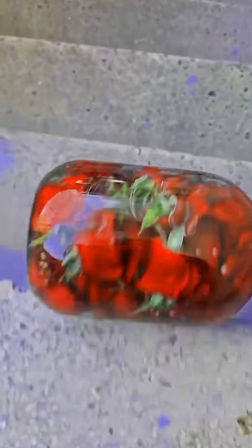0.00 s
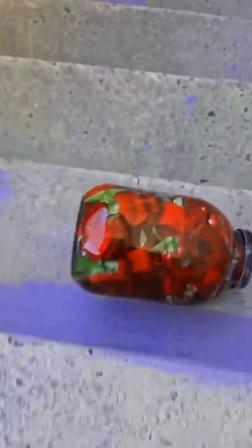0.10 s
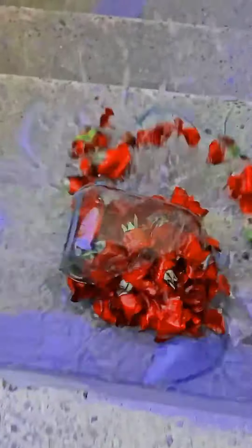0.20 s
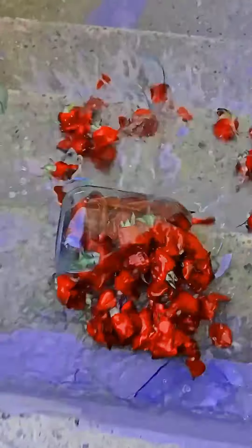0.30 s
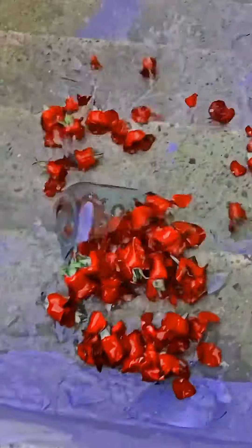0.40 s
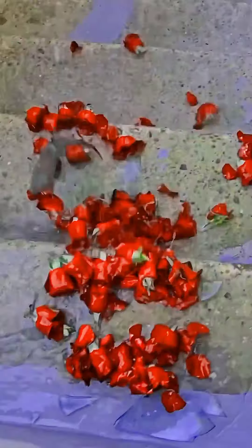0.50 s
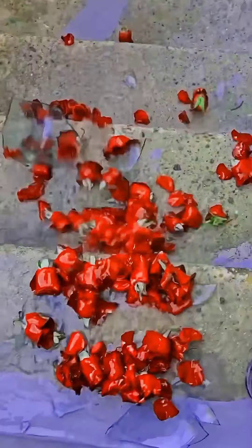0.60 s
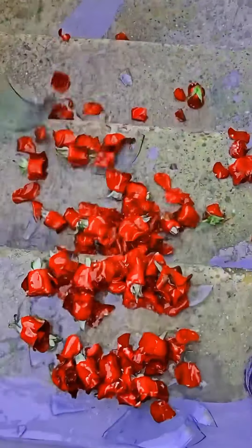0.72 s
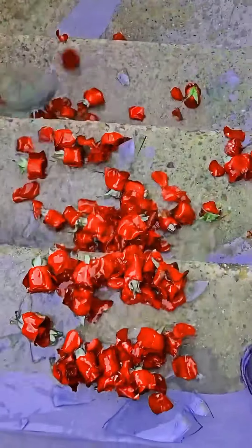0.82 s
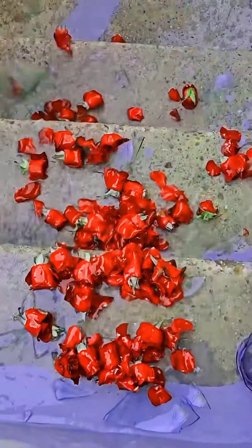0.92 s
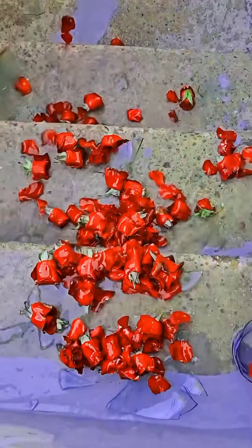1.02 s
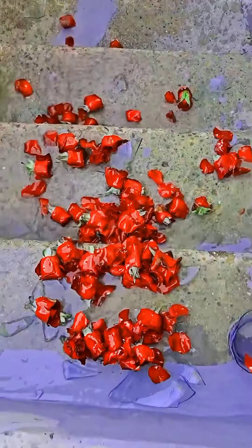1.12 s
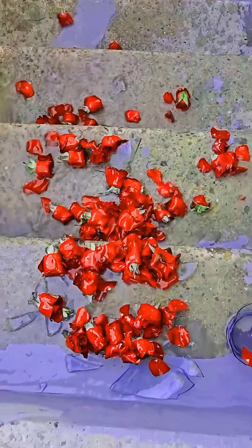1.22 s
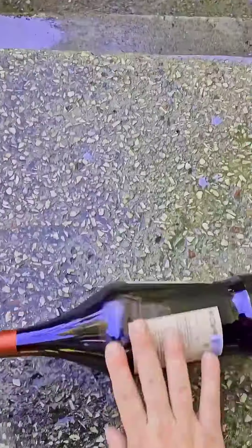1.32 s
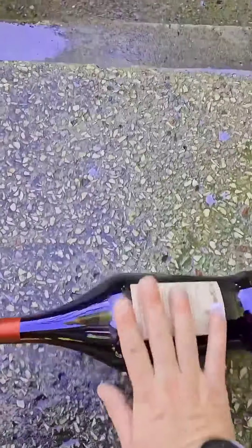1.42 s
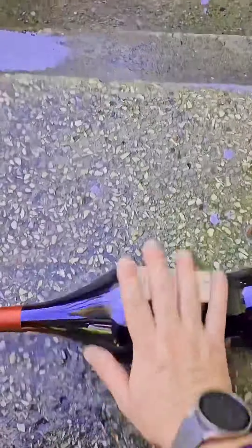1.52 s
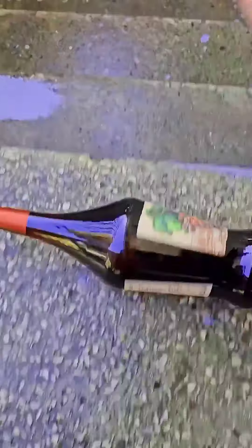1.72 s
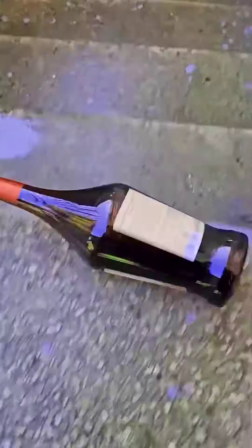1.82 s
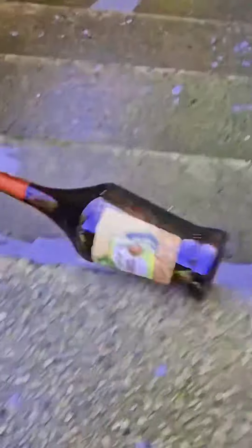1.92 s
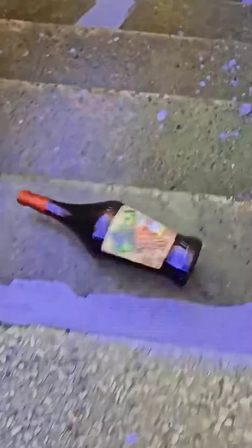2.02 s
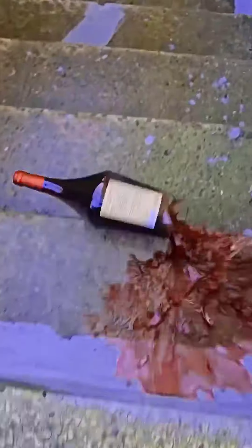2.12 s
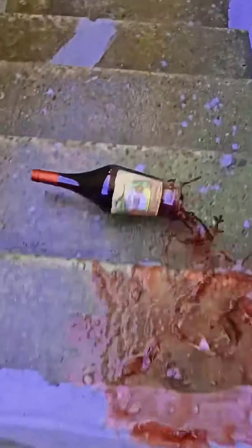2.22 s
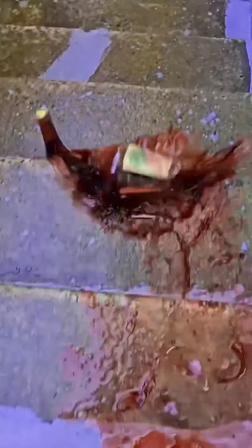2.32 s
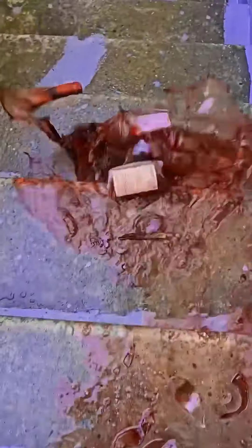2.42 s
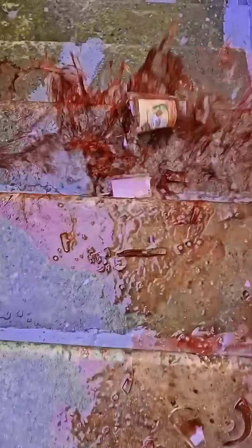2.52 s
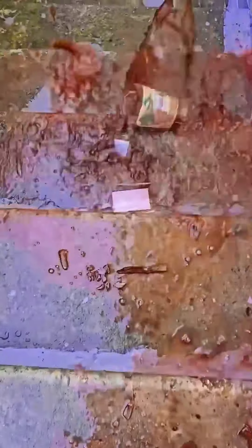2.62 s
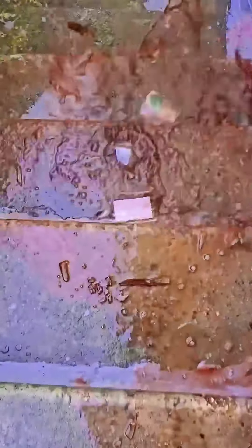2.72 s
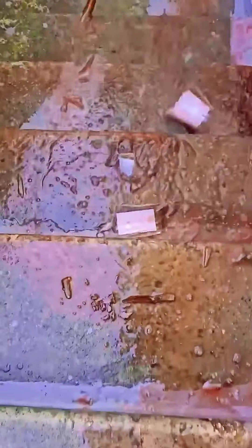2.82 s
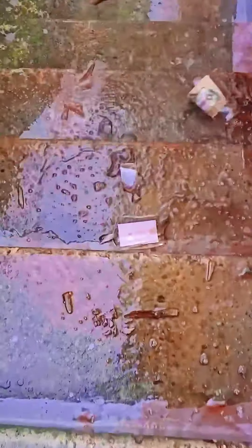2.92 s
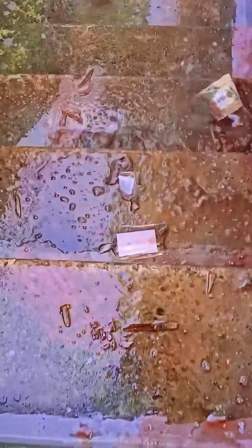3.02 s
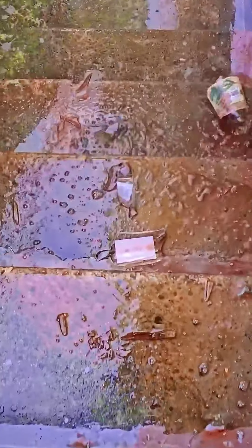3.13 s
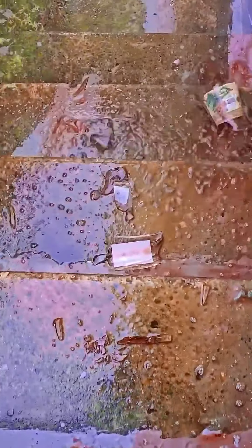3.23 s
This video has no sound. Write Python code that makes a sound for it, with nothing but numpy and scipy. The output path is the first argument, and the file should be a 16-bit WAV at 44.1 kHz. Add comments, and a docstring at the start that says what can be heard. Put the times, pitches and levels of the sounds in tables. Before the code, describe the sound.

Glass breaks on outdoor stone steps, shards clinking; abrupt cut, bottle rolls, smashes and spills.

```python
"""Glass breaking on stone, in two scenes

A full glass jar bursts on stone steps and its shards clink and skitter down them. After an abrupt cut a
full bottle rolls over pebbled concrete, knocks on a step edge, breaks, spills and scatters its pieces.
Shards and vessels ring as decaying modes; crunch, scrape and spill are shaped noise. All is heard
outdoors and close, with short reflections from the steps, over a low rumble.
"""
import sys
import numpy as np
from scipy import signal
from scipy.fft import rfft, irfft, next_fast_len
from scipy.io import wavfile

SR = 44100
rng = np.random.default_rng(int(sys.argv[2]) if len(sys.argv) > 2 else 0)


def waveform_to_disk(signal):
    """Save audio, clipped to [-1, 1], as 16-bit WAV at the path in sys.argv[1]."""
    frames = np.transpose(np.atleast_2d(signal))
    scaled = np.clip(frames, -1, 1) * 32767
    samples = np.round(scaled).astype(np.int16)
    wavfile.write(sys.argv[1], SR, samples)


N = 143325
T = np.arange(N) / SR
AGE = T[:SR * 2 // 5]  # time since an onset [s]
CUT_S = 1.369  # the jar's sound stops here
GLASS_PAN_DB = 3.5  # the pieces scatter to the left


def undb(db):
    """Logarithmic level: decibels to amplitude gain."""
    return 10 ** (np.asarray(db) / 20)


def curve(rows):
    """Envelope: gain over time, linear in decibels between (time [s], level [dB]) points."""
    times, levels = np.array(rows).T
    return undb(np.interp(T, times, levels))


def unit(x):
    """Normalisation to an rms of 1."""
    return x / np.sqrt(np.mean(x ** 2))


def pan(db):
    """Level difference between the ears: left and right gains, positive to the left."""
    return unit(undb(np.array([[db], [-db]]) / 2))


def add(out, s, x):
    """Superposition: mix a sound in at its time; what began before the cut ends there."""
    start = max(int(s * SR), 0)
    end = int(CUT_S * SR) if s < CUT_S else N
    length = max(min(x.shape[-1], end - start, out.shape[-1] - start), 0)
    out[..., start:start + length] += x[..., :length]


def grit(size, spread_db, likeness):
    """Partly correlated noise: two ears share a fraction of its power; its strength varies unevenly."""
    left_right, shared = rng.standard_normal((2, size)), rng.standard_normal(size)
    strength_db = spread_db * rng.standard_normal(size // 32 + 1)
    strength = np.repeat(undb(strength_db), 32)[:size]  # a new strength every 32 samples
    return (np.sqrt(likeness) * shared + np.sqrt(1 - likeness) * left_right) * strength


def colour(x, points):
    """Spectral shaping by (frequency [Hz], level [dB]) points on a logarithmic axis, to rms 1."""
    hz, db = np.array(points).T
    size = next_fast_len(N)
    f = np.arange(size // 2 + 1) * SR / size + 1  # 1 Hz offset avoids log(0)
    gain = undb(np.interp(np.log(f), np.log(hz), db))
    return unit(irfft(rfft(x, size) * gain, size)[:, :N])


def ring(hz, t60, phase=0):
    """Damped oscillation: one mode that falls by 60 dB in t60 seconds."""
    t = T[:int(t60 * SR) + 2]
    return np.sin(2 * np.pi * min(hz, SR / 2) * t + phase) * undb(-60 * t / t60)


CONTACT_S = 0.0018  # the ring builds up over the contact
PAIR_HZ = 46.6  # spacing of the paired modes at half a turn


def shard(hz, t60, turn):
    """Beating of a close pair of modes that reaches the ears out of step by a fraction of a turn."""
    ears = []
    for phase in (np.pi * turn, -np.pi * turn):
        main = ring(hz, t60, phase)
        partner = .5 * ring(hz + 2 * PAIR_HZ * turn, t60, 2 * phase + np.pi / 2)
        ears.append(main + partner)
    pair = np.array(ears)
    return pair * np.minimum(T[:pair.shape[1]] / CONTACT_S, 1)


SHARD_SPACING_HZ, SHARD_RIPPLE_DB = 120.1, 5.5  # the broad resonances of a handful of pieces


def pieces(x):
    """Random resonance: colour a crunch with the pieces involved, differently at each ear."""
    f = np.arange(x.shape[1] // 2 + 1) * SR / x.shape[1]
    depth_db = SHARD_RIPPLE_DB * np.minimum(f / 2500, 1)  # full depth above 2500 Hz
    ripples = [np.interp(f / SHARD_SPACING_HZ, np.arange(256), z) for z in rng.standard_normal((2, 256))]
    gain = undb(depth_db * np.array(ripples))
    return irfft(rfft(x) * unit(gain), x.shape[1])


# glass crunching on stone; levels are relative and shifted by CRUNCH_DB or SPLINTER_DB:
# (time [s], rise [s], t60 [s], thud [dB], middle [dB], treble [dB], top [dB])
CRUNCHES = [ (.042, 0.012, 0.12, -25, -30, -31.5, -43.5), (0.193, 0.034, 0.18, -22, -12.5, -11.5, -18.5),
            (0.304, 0.0087, 0.022, -35, -30, -15.5, -47), (0.341, 0.013, 0.094, -25.5, -22.5, -23, -17.5),
            (0.37, 0.0042, 0.21, -39, -27, -24.5, -37), (0.475, 0.0041, 0.085, -51, -26, -9.5, -22.5),
            (.529, 0.0049, 0.16, -25.5, -20.5, -16, -21), (0.585, 0.012, 0.16, -33, -25.5, -20, -16),
            (0.741, 0.0081, 0.11, -40, -33.5, -21.5, -17), (0.838, 0.0033, 0.49, -35.5, -35, -26.5, -23.5),
            (0.953, 0.017, 0.2, -20.5, -18.5, -19, -26.5), (1.126, 0.0039, 0.16, -43, -27.5, -23.5, -40),
            (1.162, 0.024, 0.2, -30, -25, -26, -30), (1.36, 0.006, 0.076, -57, -63, -25, -22.5),
            (1.748, 0.0041, 0.052, -28, -42, -20.5, -23.5),
            (2.02, 0.0011, 0.16, -26.5, -17.5, -21.5, -29.5), (2.0636, 0.0016, 0.019, -38, -10, -7, -14.5),
            (2.068, 0.0054, 0.42, -26.5, -33, -27.5, -30.5), (2.133, 0.00094, 0.03, -35, -13, -19.5, -27),
            (2.272, 0.002, 0.048, -14.5, -12, -13, -21.5), (2.279, 0.018, 0.15, -22, -24, -27.5, -39),
            (2.465, 0.0082, 0.2, -26, -15.5, -16.5, -24), (2.569, 0.0021, 0.057, -35, -16.5, -21, -29),
            (2.571, 0.031, 0.12, -43, -22.5, -18, -21.5), (2.773, 0.012, 0.27, -40, -22.5, -22, -27.5),
            (2.824, 0.008, 0.3, -65, -42.5, -32.5, -32.5), (2.975, 0.015, 0.12, -41.5, -32.5, -24.5, -35),
            (3.117, 0.0023, 0.18, -41.5, -28, -34, -31.5)]
# the thud, middle, treble and top bands: (lower edge [Hz], upper edge [Hz])
CRUNCH_BANDS = [(75, 350), (420, 2090), (2400, 7850), (7000, 15200)]
# power shared by the two ears in each band: (likeness [0-1])
EAR_LIKENESS = [0.97, 0.47, 0.076, 0.049]
GRIT_DB, CRUNCH_DB, SPLINTER_DB = 3.5, -2, -13.5
SPLINTER_T60_S = 0.079  # at most, before a random factor of 0.5 to 1.5


def crashes(count=26):
    """Fracture noise: each crash is a swell of tiny fractures that throws off ringing splinters."""
    out = np.zeros((2, N))
    bands = []
    for edges, likeness in zip(CRUNCH_BANDS, EAR_LIKENESS):
        band_pass = signal.butter(3, edges, "band", fs=SR, output="sos")
        bands.append(unit(signal.sosfilt(band_pass, grit(N, GRIT_DB, likeness))))
    for s, rise, t60, thud_db, mid_db, treble_db, top_db in CRUNCHES:
        swell = np.minimum(AGE / rise, 1) ** 2
        env = swell * undb(-60 * np.maximum(AGE - rise, 0) / t60)
        i = int(s * SR)
        crunch = 0
        for k, (db, band) in enumerate(zip((thud_db, mid_db, treble_db, top_db), bands)):
            side = pan(GLASS_PAN_DB * k / 2)  # higher bands lie further left
            crunch = crunch + undb(db + CRUNCH_DB) * band[:, i:i + len(AGE)] * side
        add(out, s, pieces(crunch) * env[:crunch.shape[1]])
        for k, (place, when, length, turn, side) in enumerate(rng.random((count, 5))):
            hz = 3000 + 13000 * (k + place) / count
            db = np.interp(hz, [5000, 9000], [treble_db, top_db]) + SPLINTER_DB
            life = min(SPLINTER_T60_S, t60) * (.5 + length)
            splinter = undb(db) * shard(hz, life, turn - .5)
            add(out, s + rise * (.5 + when), splinter * pan(GLASS_PAN_DB + 10 * (side - .5)))
    return out


# single shards that ring; levels are relative: (time [s], level [dB], pitch [Hz], t60 [s])
SHARD_LANDINGS = [ (.321, -19, 7440, 0.042), (0.369, -13.5, 3266, 0.097), (.373, -14.5, 5010, 0.045),
                  (.481, -13.5, 4478, .083), (.479, -30, 4700, 0.074), (0.556, -18, 7040, 0.13),
                  (.591, -13, 3200, 0.028), (.593, -12.5, 9259, .072), (0.593, -17.5, 4203, .14),
                  (.646, -15.5, 4220, .09), (0.693, -11, 8200, 0.083), (.695, -22, 5020, 0.12),
                  (.812, -19.5, 4304, .18), (.836, -8.5, 11440, 0.05), (.842, -19, 6110, 0.21),
                  (.905, -17, 7708, 0.12), (1.212, -25.5, 11940, .08), (1.25, -20, 8970, 0.1),
                  (1.283, -21, 4430, 0.081), (1.36, -13, 9431, 0.04), (2.224, -11.5, 7670, .021),
                  (2.516, -19, 5760, 0.078), (2.607, -17.5, 7110, .11), (2.784, -18.5, 3919, 0.062),
                  (2.899, -25.5, 4498, 0.17), (2.975, -21, 5790, .1), (2.974, -15, 3697, 0.037),
                  (2.981, -16, 3893, 0.13), (3.121, -34, 3890, 0.21)]
OVERTONE_DB = -15  # within the octave above a shard's pitch
CHATTER_S, CHATTER_DB = .014, -7.5  # a shard touches down again within this time


def clinks(count=3):
    """Impact excitation: a shard lands, rings with uneven overtones and chatters on the stone."""
    out = np.zeros((2, N))
    for s, db, hz, t60 in SHARD_LANDINGS:
        main_turn = rng.random() - .5
        tone = shard(hz, t60, 0.6 * main_turn)
        for above, turn in rng.random((count, 2)):
            add(tone, 0, undb(OVERTONE_DB) * shard(hz * (1 + above), t60, turn - .5))
        landing = tone.copy()
        for when in rng.random(count):
            add(landing, CHATTER_S * when, tone * undb(CHATTER_DB) / np.sqrt(count))
        same_power = unit(landing) * np.std(tone)  # chatter leaves the overall level alone
        add(out, s, same_power * undb(db) * pan(GLASS_PAN_DB))
    return out


# the jar's larger pieces: (pitch [Hz])
JAR_PIECES = [2680, 3330, 3740, 4215, 4540, 4690, 4940, 5700, 6216, 6680, 7090, 7660, 7725, 8270, 9360,
              9720, 11600]
# effort of the moving pieces, also followed by skitter(); relative: (time [s], level [dB])
FRAGMENT_EFFORT = [(.18, -55), (.23, -26.5), (.6, -25), (1.08, -30), (1.22, -27.5), (1.36, -31),
                   (1.37, -42.5), (2.01, -37.5), (2.07, -33), (2.44, -34), (2.62, -34), (2.88, -27.5),
                   (2.97, -48)]
JAR_SHARD_T60_S = .18


def tinkle(count=28):
    """Repeated impact: the jar's larger pieces tumble down, each ringing near its own pitch."""
    out, effort = np.zeros((2, N)), curve(FRAGMENT_EFFORT)
    for hz in JAR_PIECES:
        for k, (when, size, turn, side, bend) in enumerate(rng.random((count, 5))):
            s = CUT_S * (k + when) / count
            gain = effort[int(s * SR)] * undb(-20 * size)
            bent_hz = hz * (1 + (bend - .5) / 20)
            tone = gain * shard(bent_hz, JAR_SHARD_T60_S, turn - .5)
            add(out, s, tone * pan(GLASS_PAN_DB + 10 * (side - .5)))
    return out


SKITTER_T60_S = 0.1  # before a random factor of 0.06 to 1.06
TINKLE_DB, SCRAPE_DB = -10.5, -12.5  # relative to the effort curve


def skitter(count=1300):
    """Impacts and friction: small fragments tinkle and scrape as they slide down the steps."""
    tinkles = np.zeros((2, N))
    for when, pitch, length, size, turn, side in rng.random((count, 6)):
        hz = 2500 + 13500 * pitch ** 1.4
        tone = shard(hz, SKITTER_T60_S * (0.06 + length), turn - .5)
        add(tinkles, when * N / SR, tone * undb(-16 * size) * pan(14 * (side - .5)))
    scrape = colour(grit(N, spread_db=4.5, likeness=0.26),
                    [(500, 10.5), (2000, 8), (4500, 14), (9000, 8), (16000, -27.0)])
    return (undb(TINKLE_DB) * unit(tinkles) + undb(SCRAPE_DB) * scrape) * curve(FRAGMENT_EFFORT) * pan(3.7)


# heavy knocks of the full vessel on stone: (time [s], peak level [dB], pitch [Hz], t60 [s])
VESSEL_KNOCKS = [ (0.249, -15, 260, 0.027), (.536, -7, 587, 0.025), (1.6118, -9, 1500, 0.0047),
                 (1.6374, -4.5, 1530, 0.003), (1.702, -7, 950, 0.0039), (1.727, -5, 950, 0.0045),
                 (1.7333, -17, 960, .005), (1.758, -35, 1000, 0.0042), (1.7765, -4.5, 1000, 0.0018),
                 (1.802, -14, 1200, 0.0032), (1.821, -8, 1190, 0.0017), (1.825, -2.5, 1020, 0.0024),
                 (1.8518, -16, 1090, 0.0024), (1.862, 0, 1500, 0.0015), (1.873, -19, 930, 0.0035),
                 (1.904, -20.5, 190, .057), (1.933, -15, 1596, 0.025), (2.022, -4, 1210, 0.0051),
                 (2.023, -4, 2785, .01), (2.072, -9.5, 950, 0.0051), (2.136, -21.5, 1040, 0.0089),
                 (2.228, -19, 1770, 0.013), (2.2736, -7.5, 1300, 0.0017), (2.315, -26.5, 101, 0.34)]
KNOCK_RISE_S, KNOCK_EAR_RAD = 0.00042, 0.29  # build-up; phase offset at each ear (opposite signs)
# modes of the bottle, relative to the blow: (frequency [Hz], level [dB], t60 [s])
BOTTLE_MODES = [(835, -35, 0.046), (1440, -21.5, 0.095), (1780, -20, 0.024), (2620, -18.5, 0.046),
                (3026, -18, 0.051), (4700, -26, 0.055)]
# scrapes and blows that set the bottle ringing: (time [s], level [dB], frequency [Hz], t60 [s])
RINGING_BLOWS = [(1.552, -25, 2880, 0.092), (1.615, -26, 1448, 0.31), (1.64, -20.5, 1455, 0.26),
                 (2.023, -16.5, 2626, 0.15)]


def vessel():
    """Modal response: the vessel knocks and rolls; after the cut the blows ring the bottle's modes."""
    out, blows = np.zeros((2, N)), np.zeros(N)
    for s, db, hz, t60 in VESSEL_KNOCKS:
        knock = np.array([ring(hz, t60, phase) for phase in (KNOCK_EAR_RAD, -KNOCK_EAR_RAD)])
        knock = knock * (1 - np.exp(-T[:knock.shape[1]] / KNOCK_RISE_S)) ** 2
        add(out, s, undb(db) * knock / np.abs(knock).max())
        if s > CUT_S:
            blows[int(s * SR)] = undb(db)
    body = np.zeros((2, N // 4))
    for hz, db, t60 in BOTTLE_MODES:
        add(body, 0, undb(db) * shard(hz, t60, 0.35))
    for s, db, hz, t60 in RINGING_BLOWS:
        add(out, s, undb(db) * ring(hz, t60))
    return out + signal.fftconvolve(blows[None], body)[:, :N] + rolling()


# rolling on pebbled concrete: (time [s], rms level [dB])
ROLL_LEVEL = [(0, -35), (.13, -55), (.2, -42.5), (.3, -61), (1.33, -74), (1.39, -49), (1.54, -38),
              (1.62, -29), (1.87, -28), (2.01, -62)]
# spectrum of the rolling, relative: (frequency [Hz], level [dB])
ROLL_SPECTRUM = [(100, -6), (450, -1), (850, 7), (1400, -1), (2200, -11.5), (3000, -5), (4200, -14),
                 (16000, -32)]


def rolling():
    """Rolling contact: pebble ticks and grinding, coloured and swelling with the roll."""
    return colour(pebbles(), ROLL_SPECTRUM) * curve(ROLL_LEVEL)


PEBBLES_PER_S, PEBBLE_DB = 100, 5  # rate; spread of tick strength
GRIND_DB = 2  # relative to the ticks


def pebbles(count=600):
    """Roughness excitation: a tick for each pebble the glass rides over, with grinding in between."""
    ticks = np.zeros(N)
    for k, (late, size) in enumerate(rng.standard_normal((count, 2))):
        add(ticks, (k + late / 2) / PEBBLES_PER_S, undb([PEBBLE_DB * size]))
    ticks = signal.fftconvolve(ticks, np.hanning(20))[:N]  # the rounded glass softens each contact
    return unit(ticks) + undb(GRIND_DB) * unit(grit(N, spread_db=1.5, likeness=0.41))


# wet contents slapping and spattering: (time [s], rms level [dB])
SPILL_LEVEL = [(.19, -52), (.25, -38), (.62, -38.5), (.78, -42.5), (1.25, -46.5), (1.8, -39), (1.91, -35),
               (2.24, -57), (2.33, -27.5), (2.44, -48), (2.55, -47.5), (2.95, -59)]
# spectrum of the spill, relative: (frequency [Hz], level [dB])
SPILL_SPECTRUM = [(80, 4.5), (200, 3), (600, 9.5), (2500, -11), (6000, -16.5), (16000, -62)]
SPLATS_PER_S, SPLAT_DB = 130, 6  # rate of random level points; their spread


def spill():
    """Amplitude-modulated noise: wet contents slap and spatter on the stone in uneven splats."""
    levels = rng.standard_normal(N // 64)
    splats = undb(SPLAT_DB * np.interp(T * SPLATS_PER_S, np.arange(len(levels)), levels))
    spatter = grit(N, spread_db=4.5, likeness=0.75) * splats
    return colour(spatter, SPILL_SPECTRUM) * curve(SPILL_LEVEL)


STEPS_T60_S = 0.23


def reflections(sent):
    """Diffuse reflection: decaying noise stands for the steps; echoes too stop at the cut."""
    steps = rng.standard_normal((2, len(AGE))) * undb(-60 * AGE / STEPS_T60_S)
    steps = steps * (AGE > .002)  # the first reflection arrives after 2 ms
    steps = steps / np.sqrt(np.sum(steps ** 2) / 2)
    before = T < CUT_S
    jar_echo = signal.fftconvolve(sent * before, steps, axes=1)[:, :N] * before
    bottle_echo = signal.fftconvolve(sent * ~before, steps, axes=1)[:, :N]
    return jar_echo + bottle_echo


# outdoor rumble: (time [s], rms level [dB])
RUMBLE_LEVEL = [(0, -35.5), (.8, -43.5), (1.5, -43), (1.75, -37), (1.95, -33.5), (2.3, -38.5), (3.25, -44)]
# spectrum of the rumble, relative: (frequency [Hz], level [dB])
RUMBLE_SPECTRUM = [(20, -8.5), (50, 1.5), (110, -4), (200, -10), (500, -36), (16000, -50)]


def rumble():
    """Low-frequency noise: nearly alike at both ears, its level drifting slowly."""
    return colour(grit(N, spread_db=1.5, likeness=0.95), RUMBLE_SPECTRUM) * curve(RUMBLE_LEVEL)


STEPS_DB, BOTTLE_STEPS_DB = -11, -11.5  # reflections of the glass; of the vessel and spill


def scene():
    """Superposition of direct sound, short reflections from the steps and the outdoor rumble."""
    glass = crashes() + clinks() + tinkle() + skitter()
    heavy = vessel() + spill()
    sent = undb(STEPS_DB) * glass + undb(BOTTLE_STEPS_DB) * heavy
    return glass + heavy + reflections(sent) + rumble()


TOP_HZ = 16100


def record(dry):
    """Peak limiting and low-pass filtering: the recorder holds the highest peaks and cuts the top."""
    held = np.clip(dry, -.95, .95)
    low_pass = signal.ellip(10, .2, 80, TOP_HZ, fs=SR, output="sos")
    return signal.sosfilt(low_pass, held)


dry = scene()
out = record(dry)
waveform_to_disk(out)
```